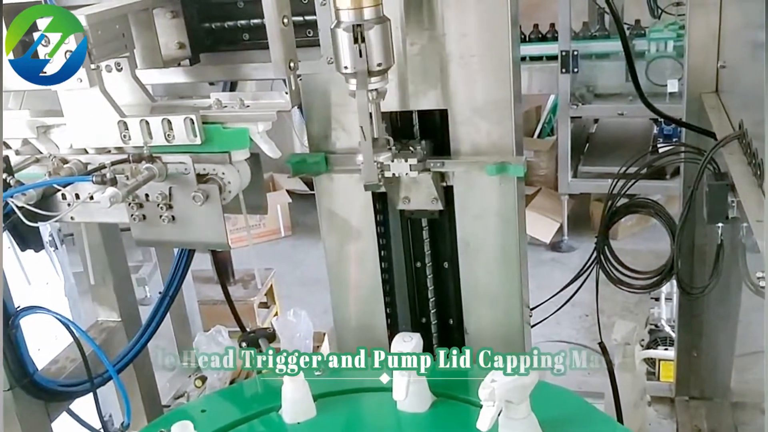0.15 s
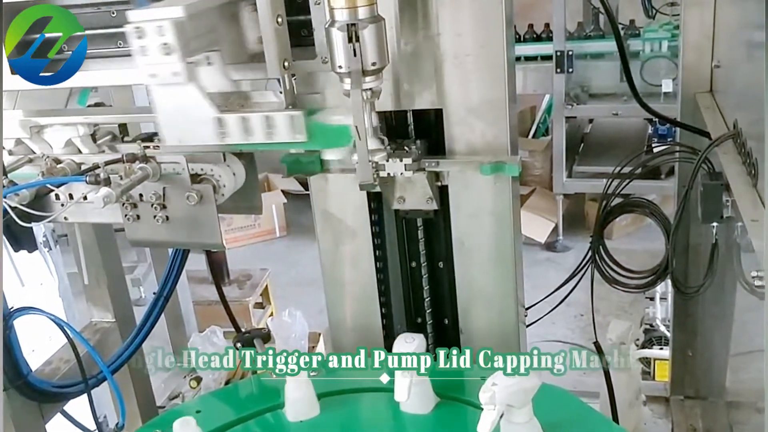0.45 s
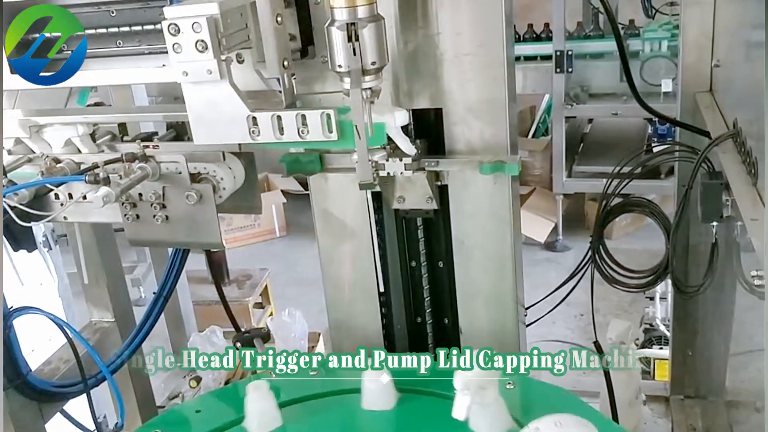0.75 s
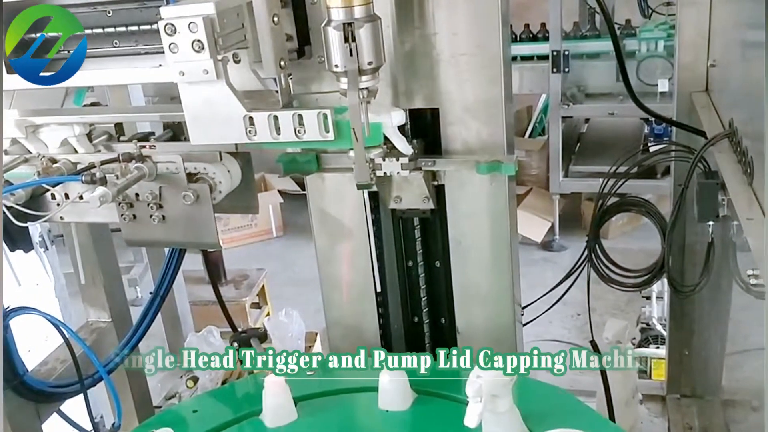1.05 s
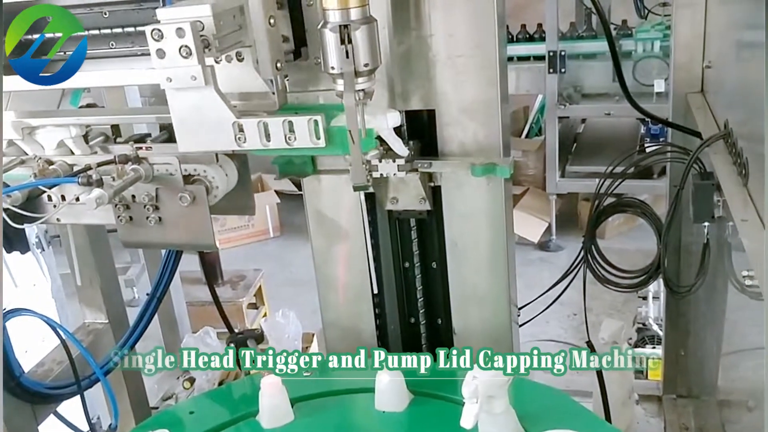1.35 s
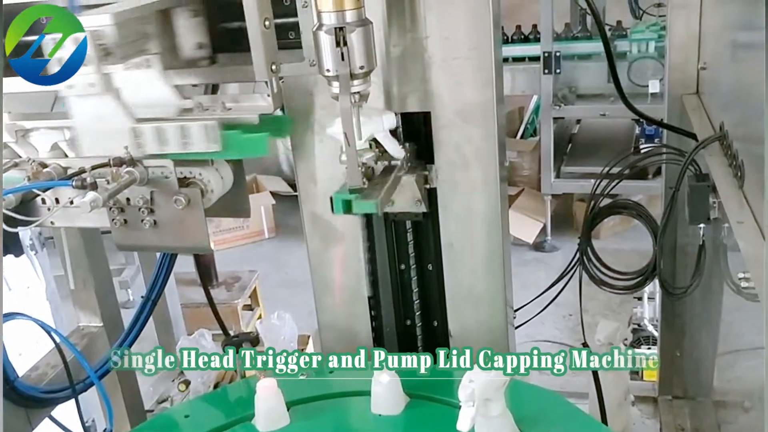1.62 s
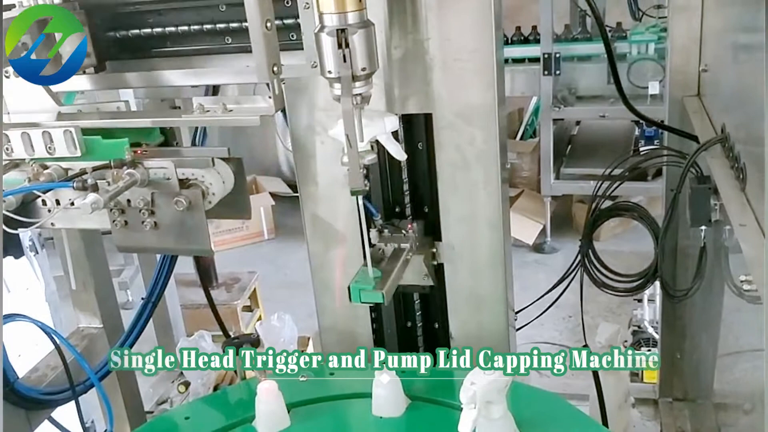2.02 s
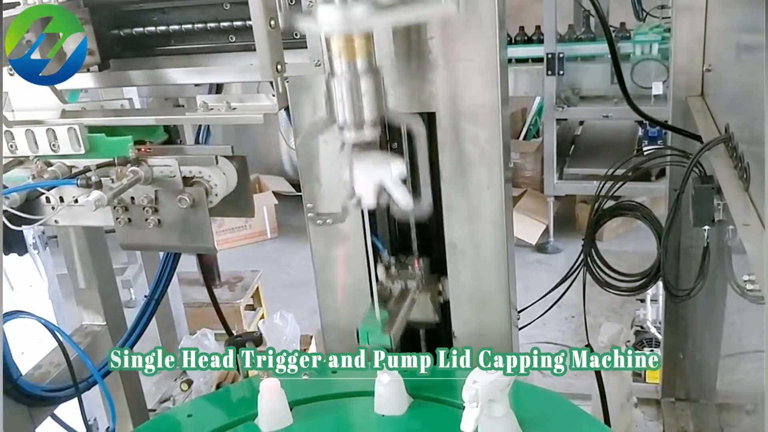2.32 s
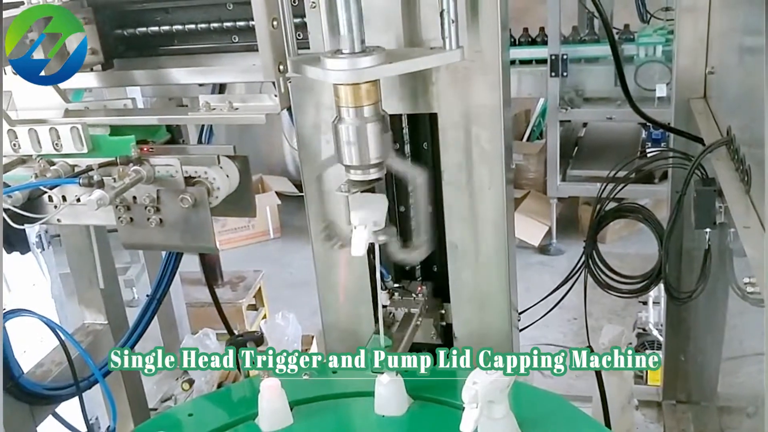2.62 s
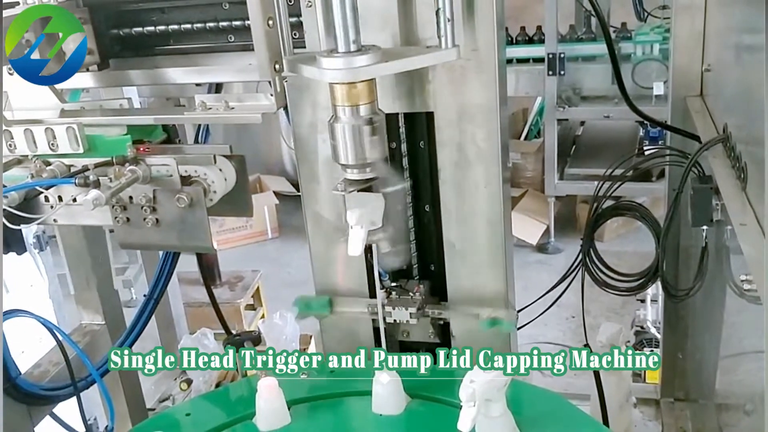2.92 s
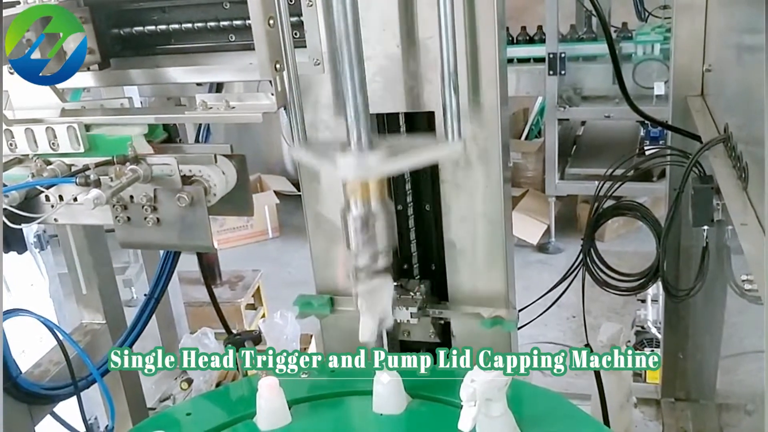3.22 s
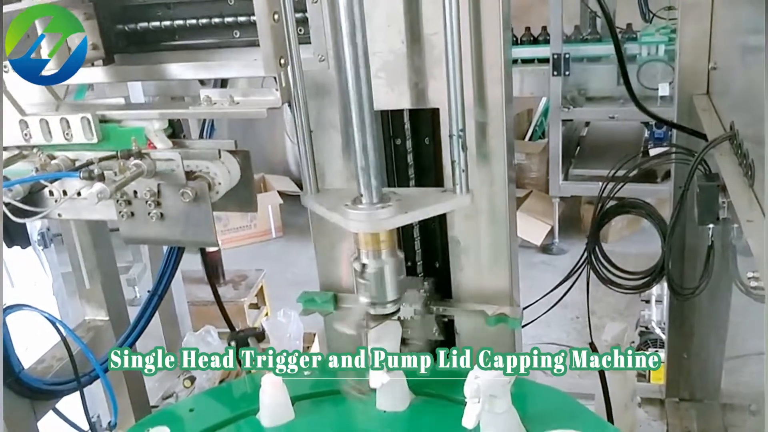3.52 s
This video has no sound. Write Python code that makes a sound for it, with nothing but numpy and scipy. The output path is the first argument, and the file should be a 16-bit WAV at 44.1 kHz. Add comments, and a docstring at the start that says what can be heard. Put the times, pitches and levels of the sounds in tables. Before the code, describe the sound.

A pneumatic capping machine works close by in a humming, rumbling workshop. From 0.15 to 0.7 s slides whir with rising gear tones and hissing air; puffs follow at 0.8 and 1.0. A whir starts at 1.35, cut by a loud jangling snap at 1.54. A hollow knock lands at 1.96, puff and whir at 2.1, clicks near 2.9, strong whirring with thin whine around 3.2, heavy ringing thump at 3.44, last puff 3.53.

```python
"""Pneumatic capping machine

One cycle is heard from close by in a humming workshop. Slides whir as random ball impacts excite
rails and steel; gear tones glide up. Valve puffs and cylinder bleeds are shaped, hissing noise.
Clicks, knocks and rattles are noise bursts, and thumps strike decaying frame modes. A thin, rough
whine, shop noise, a wavering hum and a low rumble run alongside; the rumble is sharply thinned at
1.5 s and slowly returns. A diffuse tail follows the machine.
"""
import sys
import numpy as np
from scipy import signal
from scipy.fft import rfft, irfft, next_fast_len
from scipy.io import wavfile

SR = 44100
rng = np.random.default_rng(int(sys.argv[2]) if len(sys.argv) > 2 else 0)


def digitize_waveform(pressure):
    """Quantize a signal to 16-bit integers and store it at the path in sys.argv[1].

    Rows of a 2-D input are taken as channels; values are limited to [-1, 1].
    """
    field = np.atleast_2d(pressure).T
    bounded = np.clip(field, -1, 1)
    quanta = np.round(bounded * 32767).astype(np.int16)
    wavfile.write(sys.argv[1], SR, quanta)


N = 161406  # length in samples

# Slide strokes. Each row: start in seconds, speed-up in seconds, start of slowing in seconds,
# slow-down in seconds, level in dB, treble boost in dB, rail ring in dB.
STROKES = [(.14, 0.29, 0.49, 0.038, -28, 7.5, -41.5), (0.529, .035, 0.7, .15, -33, 6.5, -32.5),
           (1.342, 0.037, 1.505, 0.063, -30, 9.5, -41), (1.56, 0.033, 1.76, 0.088, -32.5, -13, -32.5),
           (2.12, 0.11, 2.321, 0.063, -26, -0.5, -25), (2.975, 0.027, 3.1, 0.081, -22.5, -1.5, -28.5),
           (3.11, .04, 3.228, .16, -22.5, -10, -26.5)]
# Rolling spectrum of the slides. Each row: frequency in Hz, gain in dB.
SLIDE_SPECTRUM = [(100, -24), (200, -9), (340, 8.5), (480, -2.5), (700, 5), (1100, -3.5), (1600, -13.5),
                  (2400, -11.5), (4000, -19), (7000, -33), (16000, -33)]
# Resonances of the rails. Each row: frequency in Hz, gain in dB, t60 in seconds.
RAIL_MODES = [(183, -4, .6), (328, 0, .3), (392, -4, .12), (622, -4, .12), (662, -2, .15)]
# Ringing steel of the slides and stops. Each row: frequency in Hz, gain in dB.
STEEL_MODES = [(3370, -4), (3650, -1), (3745, -1), (3960, 0), (4040, -1), (4402, -1), (4610, -3),
               (4856, -4), (5195, -1), (5615, -4)]
BALLS_PER_S, BRIGHT_HZ = 2400, 1280  # impacts per second; corner of the treble boost
STEEL_DB, STEEL_T60_S = -20.5, 0.23  # steel ring level is against the stroke
FLUTTER_DB = 2.0  # depth of the random level flutter in slides and gears

# Runs of the drives. Each row: start in seconds, speed-up in seconds, start of slowing in seconds,
# nominal top pitch in Hz, level in dB before flutter.
DRIVES = [(0.151, 0.23, 0.45, 1240, -30), (0.549, 0.038, 0.72, 745, -34), (1.33, 0.095, 1.5, 1070, -30),
          (1.70, 0.026, 1.76, 1070, -34.5), (1.78, 0.0193, 1.86, 760, -32), (2.17, .04, 2.31, 660, -25.5),
          (3.12, 0.053, 3.27, 615, -28)]
DRIVE_START_SHARE, DRIVE_FALL_S = 0.3, 0.042  # starting share of the top speed; fade-out
GEAR_RATIO, GEAR_DB, SHAFT_DB = 0.93, -7, -2  # second gear against nominal pitch; levels
MESH_WOBBLE = 0.029  # random pitch deviation, as a share

# Valve puffs. Each row: start in seconds, rise in seconds, air level in dB, exhaust boom in dB.
PUFFS = [(.815, 0.013, -22, -24), (1.019, 0.012, -19, -13), (1.922, 0.0066, -23.5, -24),
         (2.116, 0.01, -19, -21), (2.514, 0.016, -26.5, -21), (2.921, 0.0078, -21, -23),
         (3.218, 0.0081, -21, -25), (3.533, 0.011, -23.5, -19.5)]
# Spectrum of the puffs. Each row: frequency in Hz, gain in dB.
PUFF_SPECTRUM = [(150, -45), (350, 16.5), (800, 11.5), (1500, 1.5), (3000, 0), (5500, 3), (8000, -4.5),
                 (12000, 5.5), (16000, 4)]
# Air bleeding from moving cylinders. Each row: start in seconds, start of fall in seconds, level in dB.
BLEEDS = [(0.135, 0.464, -27.5), (0.49, 0.71, -27), (1.345, 1.522, -26), (1.598, 1.853, -30),
          (2.152, 2.311, -28), (2.95, 3.233, -29.5), (3.308, 3.604, -33.5)]
# Spectrum of the bleeding air. Each row: frequency in Hz, gain in dB.
BLEED_SPECTRUM = [(500, 5), (2000, 1.5), (4500, -5), (7500, -12), (11000, -3), (12500, 3), (16000, 3.5)]
# Narrow treble bands in the hiss. Each row: frequency in Hz, gain in dB.
HISS_BANDS = [(11885, -3), (12116, -1), (12581, 0), (14817, -3)]
PUFF_HOLD_S, PUFF_DECAY_S, BOOM_HZ, BOOM_DECAY_S = 0.012, 0.029, 325.8, 0.018
BLEED_RISE_S, BLEED_FALL_S = 0.057, 0.059
HISS_BANDS_DB, HISS_BANDS_T60_S = -18, 0.066  # level against the broad hiss

# Gripper and latch clicks. Each row: time in seconds, crack level in dB, drive of ring and jangle in dB.
CLICKS = [(0.9439, -20, -40), (1.205, -22, -58), (1.292, -21, -39), (1.538, -7.5, -16), (1.590, -20, -33),
          (2.4977, -25, -58), (2.866, -16.5, -40), (2.874, -24, -49), (2.9878, -16.5, -39),
          (3.052, -14.5, -49), (3.097, -18.5, -52), (3.435, -20.5, -42)]
# Spectrum of the crack. Each row: frequency in Hz, gain in dB.
CLICK_SPECTRUM = [(300, -3), (1000, 5), (2300, -4), (3700, 1), (6000, 4.5), (8000, -6.5), (12000, 2),
                  (16000, 1)]
# Spectrum of jangling loose fittings. Each row: frequency in Hz, gain in dB.
JANGLE_SPECTRUM = [(2300, -15), (3500, 11), (5400, 6), (7500, -40)]
CLICK_DECAY_S = 0.0056
JANGLE_DB, JANGLE_DECAY_S, JANGLE_PER_S = -11, 0.12, 2200  # level against drive; impacts per second

# Blows on the frame. Each row: time in seconds, ring drive in dB, centre of the push in Hz, rattle in dB.
THUMPS = [(.555, -22, 267, -35), (.654, -23.5, 236, -23), (.824, -26, 420, -38), (1.212, -17.5, 422, -24),
          (1.562, -20.5, 460, -26), (2.256, -30, 200, -23.5), (2.683, -29, 610, -39),
          (3.4369, -7.5, 312, -12.5), (3.575, -20.5, 397, -18)]
# Pitches of the frame's modes. Each entry: frequency in Hz.
FRAME_HZ = [181.5, 262, 269, 330, 410, 474, 642]
# Strength of those modes, in the same order. Each row: gain in dB, t60 in seconds.
FRAME_MODES = [(-3.5, 0.5), (-4, 1.36), (-2.5, 0.22), (-0.5, 0.11), (-2, 0.15), (-3, 0.25), (4, 0.075)]
# Spectrum of the rattle. Each row: frequency in Hz, gain in dB.
RATTLE_SPECTRUM = [(80, -2), (200, 1), (350, -5.5), (750, 0.5), (1500, -12), (3000, -19.5), (8000, -35.5)]
# Hollow knocks of the carriages at their stops. Each row: time in seconds, level in dB.
KNOCKS = [(1.961, -14.5), (1.978, -26), (3.4355, -33)]
# Spectrum of the knocks. Each row: frequency in Hz, gain in dB.
KNOCK_SPECTRUM = [(700, -15), (1350, 5.5), (2200, -13.5), (2750, -7), (4000, -24), (12000, -40)]
RATTLE_DECAY_S, KNOCK_DECAY_S = 0.0091, 0.0064
PUSH_OCTAVES = 0.46  # spread of a blow's push around its centre
CHECK_S = 0.051  # a new blow stops the earlier ring with this time constant

# Level curve of the whine. Each row: time in seconds, level in dB before roughness.
WHINE_LEVEL = [(.2, -68), (.36, -53), (1.298, -61.5), (1.5, -53), (2.05, -60), (2.28, -48.5), (2.5, -72),
               (3.0, -54), (3.18, -41), (3.255, -39.5), (3.31, -60)]
WHINE_HZ = 8000  # centre pitch

# Spectrum of the workshop's machinery. Each row: frequency in Hz, gain in dB.
SHOP_SPECTRUM = [(20, -23), (120, -11.5), (200, -8.5), (330, -0.5), (480, -6.5), (680, -4.5), (1000, -15.5),
                 (2000, -22), (4000, -27.5), (8000, -40), (16000, -30)]
# Spectrum of the low rumble. Each row: frequency in Hz, gain in dB.
RUMBLE_SPECTRUM = [(15, -6), (34, 8.5), (60, 2), (130, 2.5), (220, 2.5), (400, -33.5)]
# Low rumble, sharply thinned at 1.5 s and slowly returning. Each row: time in seconds, level in dB.
RUMBLE_THINNING = [(0, -32), (1.502, -33.5), (1.53, -55), (1.8, -40), (2.499, -32.5), (3.2, -29.5)]
SHOP_DB, HUM_HZ, HUM_DB = -31, 331, -40.5  # hum pitch and level are centres of their wavering

# Stereo width of noise. Each row: frequency in Hz, side minus mid in dB.
WIDTH = [(60, -19.5), (130, -19), (250, -15), (500, -8), (1000, -5), (2000, 0.5)]
ROOM_T60_S, ROOM_DB = 0.44, -9.5
# Colour of both microphone ports. Each row: frequency in Hz, gain in dB.
PORTS = [(7000, 0.5), (8100, 3), (8800, -11), (10000, -5), (12000, 0), (16000, 0)]
# Extra colour of the right port. Each row: frequency in Hz, gain against the left in dB.
RIGHT_PORT = [(700, 0.5), (1300, .5), (4400, -1.5), (8000, 1), (10000, -6), (12000, -14), (16000, -20)]
TOP_HZ = 15900  # top of the passband


def undb(db):
    """Decibels to gain."""
    return 10 ** (np.asarray(db) / 20)


def unit(x):
    """Scale to rms 1."""
    return x / np.sqrt(np.mean(x ** 2))


def since(start=0):
    """Seconds since a moment, zero before it."""
    return np.maximum(np.arange(N) / SR - start, 0)


def colour(x, points):
    """Causal minimum-phase filter through (Hz, dB) points."""
    hz, db = np.array(points, float).T
    size = 2 * next_fast_len(N)
    f = np.maximum(np.arange(size // 2 + 1) * SR / size, 1)
    gain = undb(np.interp(np.log(f), np.log(hz), db))
    cepstrum = irfft(np.log(gain))
    # folding the cepstrum forward makes the filter causal
    cepstrum[1:size // 2] *= 2
    cepstrum[size // 2 + 1:] = 0
    return irfft(rfft(x, size) * np.exp(rfft(cepstrum)))[..., :N]


def spread(pair):
    """Mix two unrelated signals to left and right, most alike in the bass."""
    side = colour(pair[1], WIDTH)
    return np.array([pair[0] + side, pair[0] - side])


def noise(points):
    """Stereo noise of rms 1 with a given spectrum."""
    return unit(colour(spread(rng.standard_normal((2, N))), points))


def walk(rate):
    """Random drift gliding between new values, rate times a second."""
    knots = rng.standard_normal(4096)
    return np.interp(since() * rate, np.arange(len(knots)), knots)


def patter(per_s):
    """Two streams of tiny impacts of random size."""
    return rng.standard_normal((2, N)) * (rng.random((2, N)) < per_s / SR)


def decay(t, t60):
    """Exponential decay, down 60 dB after t60 seconds."""
    return np.exp(-np.log(1000) * t / t60)


def ring(x, modes):
    """Drive a body's decaying modes."""
    t = since()[:SR]
    response = sum(undb(db) * np.sin(2 * np.pi * hz * t) * decay(t, t60) for hz, db, t60 in modes)
    return signal.fftconvolve(x, response)[:N]


def taps(rows):
    """One impulse for each (s, dB)."""
    x = np.zeros(N)
    for start, db in rows:
        x[int(start * SR)] += undb(db)
    return x


def burst(start, rise, hold, fall):
    """Steepening rise, hold and exponential decay."""
    return np.minimum(since(start) / rise, 1) ** 2 * np.exp(-since(start + rise + hold) / fall)


def travel(start, rise, end, fall):
    """Speed up, run and slow down."""
    return np.minimum(since(start) / rise, 1) * np.maximum(1 - since(end) / fall, 0)


def rung(x, drive, modes):
    """Ring modes with an excitation at the level of the drive curve."""
    return ring(x * drive, modes) / np.std(ring(x, modes))


def slides():
    """Bearing balls patter unevenly along the rails and ring them and the steel."""
    balls = patter(BALLS_PER_S) * undb(FLUTTER_DB * walk(170))
    roll = unit(colour(spread(balls), SLIDE_SPECTRUM))
    high_pass = signal.butter(1, BRIGHT_HZ, "high", fs=SR, output="sos")
    treble = signal.sosfilt(high_pass, roll)
    rolling = on_rails = on_steel = 0
    for start, rise, end, fall, db, bright_db, rail_db in STROKES:
        speed = travel(start, rise, end, fall)
        rolling = rolling + speed * undb(db) * (roll + (undb(bright_db) - 1) * treble)
        on_rails = on_rails + undb(rail_db) * speed
        on_steel = on_steel + undb(db + STEEL_DB) * speed
    steel_modes = [(hz, db, STEEL_T60_S) for hz, db in STEEL_MODES]
    rails = rung(balls[0], on_rails, RAIL_MODES)
    steel = np.array([rung(x, on_steel, steel_modes) for x in balls])
    return rolling + rails + steel


def gear_tone(ratio, hz, speed, load):
    """A sine at a share of the drive's pitch, with random wobble."""
    pitch = ratio * hz * speed * (1 + MESH_WOBBLE * walk(250))
    return load * np.sin(2 * np.pi * np.cumsum(pitch) / SR)


def drives():
    """Two gear tones glide up with the speed; the half-pitch shaft shakes the rails' resonances."""
    gears = shaft = 0
    for start, rise, end, hz, db in DRIVES:
        run_up = np.minimum(since(start) / rise, 1) ** 2
        speed = DRIVE_START_SHARE + (1 - DRIVE_START_SHARE) * run_up
        # the level is up before the pitch
        load = undb(db) * travel(start, 0.59 * rise, end, DRIVE_FALL_S)
        first_gear = gear_tone(0.99, hz, speed, load)
        second_gear = undb(GEAR_DB) * gear_tone(GEAR_RATIO, hz, speed, load)
        gears = gears + first_gear + second_gear
        shaft = shaft + gear_tone(0.5, hz, speed, load)
    shaken_rails = undb(SHAFT_DB) * np.std(gears) * unit(ring(shaft, RAIL_MODES))
    return gears * undb(FLUTTER_DB * walk(90)) + shaken_rails


def air():
    """Valves vent with a hiss and a short boom; cylinders bleed while they move."""
    puff = boom = 0
    for start, rise, air_db, boom_db in PUFFS:
        puff = puff + undb(air_db) * burst(start, rise, PUFF_HOLD_S, PUFF_DECAY_S)
        boom_level = undb(boom_db) * burst(start, rise, PUFF_HOLD_S, BOOM_DECAY_S)
        boom = boom + boom_level * np.sin(2 * np.pi * BOOM_HZ * since(start))
    bleed = sum(undb(db) * travel(start, BLEED_RISE_S, end, BLEED_FALL_S) for start, end, db in BLEEDS)
    bands = [(hz, db, HISS_BANDS_T60_S) for hz, db in HISS_BANDS]
    breath = rng.standard_normal((2, N))
    narrow_hiss = undb(HISS_BANDS_DB) * np.array([unit(ring(x, bands)) for x in breath])
    puff_hiss = noise(PUFF_SPECTRUM) + narrow_hiss
    bleed_hiss = noise(BLEED_SPECTRUM) + narrow_hiss
    return puff * puff_hiss + boom + bleed * bleed_hiss


def steel_snap(snaps):
    """Ring the steel with every mode slightly detuned at random."""
    modes = [(hz * (1 + 0.0058 * rng.standard_normal()), db, STEEL_T60_S) for hz, db in STEEL_MODES]
    return ring(snaps, modes)


def clicks():
    """Small steel parts snap against their stops, ring and set loose fittings jangling."""
    crack_level = sum(undb(db) * burst(s, 0.00058, 0.0023, CLICK_DECAY_S) for s, db, _ in CLICKS)
    crack = crack_level * noise(CLICK_SPECTRUM)
    loose = unit(colour(patter(JANGLE_PER_S), JANGLE_SPECTRUM))
    jangle_level = sum(undb(db + JANGLE_DB) * burst(s, 0.00033, 0, JANGLE_DECAY_S) for s, _, db in CLICKS)
    snaps = taps([(s, db) for s, _, db in CLICKS])
    steel = np.array([steel_snap(snaps) for _ in range(2)])  # left and right detuned apart
    return crack + jangle_level * loose + steel / np.sqrt(len(STEEL_MODES))


def knocks():
    """Loose parts rattle at each thump, and the carriages knock at their stops."""
    rattle = sum(undb(db) * burst(s, 0.00011, 0.0055, RATTLE_DECAY_S) for s, _, _, db in THUMPS)
    knock = sum(undb(db) * burst(s, 0.00066, 0.0018, KNOCK_DECAY_S) for s, db in KNOCKS)
    return rattle * noise(RATTLE_SPECTRUM) + knock * noise(KNOCK_SPECTRUM)


def frame_ring():
    """Each blow excites the frame modes near its push and stops the earlier ring."""
    frame = 0
    for start, db, centre, _ in THUMPS:
        t = since(start)
        frame = frame * np.exp(-t / CHECK_S)
        for k, (hz, (mode_db, t60)) in enumerate(zip(FRAME_HZ, FRAME_MODES)):
            push = np.exp(-0.5 * (np.log2(hz / centre) / PUSH_OCTAVES) ** 2)
            sign = (-1) ** ((k + 1) // 2)  # polarity flips every second mode
            level = sign * push * undb(db + mode_db)
            frame = frame + level * np.sin(2 * np.pi * hz * t) * decay(t, t60)
    return frame


def whine():
    """The drive's thin high tone follows a level curve, with separate roughness left and right."""
    s, db = np.array(WHINE_LEVEL).T
    tone = np.sin(2 * np.pi * np.cumsum(WHINE_HZ + 8 * walk(55)) / SR)
    swell = undb(np.interp(since(), s, db))
    return np.array([tone * swell * (1.2 + 0.5 * walk(24.77) + 1.23 * walk(160)) for _ in range(2)])


def workshop():
    """Steady machinery noise, a wavering hum and a low rumble, sharply thinned and slowly returning."""
    hum_level = undb(HUM_DB + 7.3 * walk(6.58))
    hum = hum_level * np.sin(2 * np.pi * np.cumsum(HUM_HZ + 7 * walk(30)) / SR)
    s, db = np.array(RUMBLE_THINNING).T
    rumble = undb(np.interp(since(), s, db)) * noise(RUMBLE_SPECTRUM)
    return undb(SHOP_DB) * noise(SHOP_SPECTRUM) + hum + rumble


def room(x):
    """A diffuse, decaying noise tail from the walls and the machine's panels."""
    envelope = burst(0.00086, 0.0046, 0, ROOM_T60_S / np.log(1000))
    tail = noise([(150, 1.1), (1000, 7.7), (16000, 1.7)]) * envelope  # (Hz, dB)
    tail = tail / np.sqrt(np.sum(tail ** 2) / 2)
    return undb(ROOM_DB) * signal.fftconvolve(x, tail, axes=1)[:, :N]


def scene():
    """The machine with its room tail; frame, whine and workshop join without one."""
    machine = slides() + drives() + air() + clicks() + knocks()
    return machine + room(machine) + frame_ring() + whine() + workshop()


def record(dry):
    """Two microphone ports, the right one duller; peaks clip and the top is cut."""
    left, right = colour(dry, PORTS)
    clipped = np.clip([left, colour(right, RIGHT_PORT)], -0.9, 0.9)
    low_pass = signal.ellip(10, 0.2, 70, TOP_HZ, fs=SR, output="sos")
    return signal.sosfilt(low_pass, clipped)


dry = scene()
out = record(dry)
digitize_waveform(out)
```